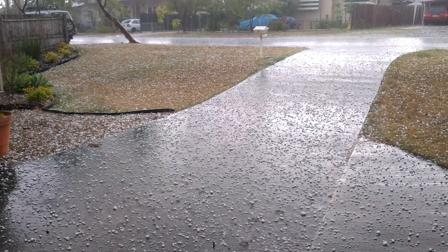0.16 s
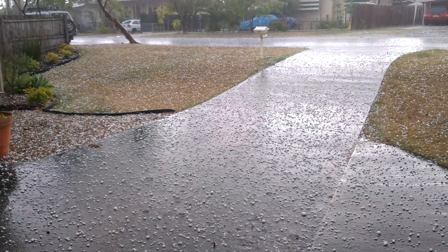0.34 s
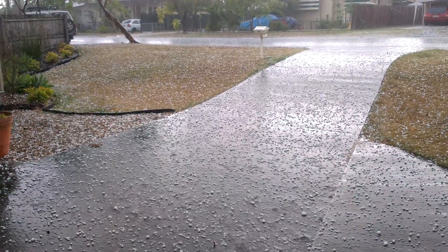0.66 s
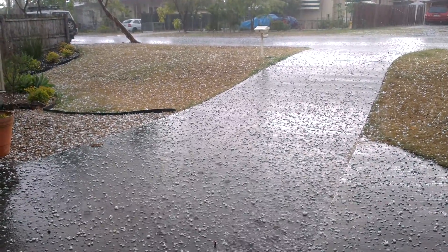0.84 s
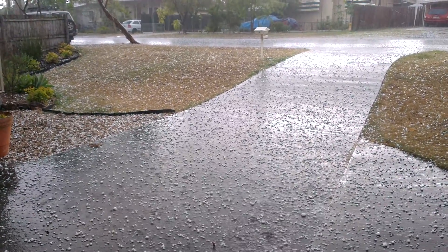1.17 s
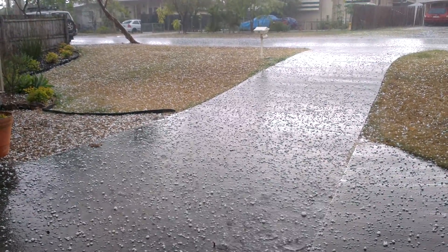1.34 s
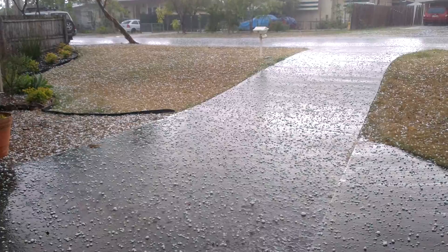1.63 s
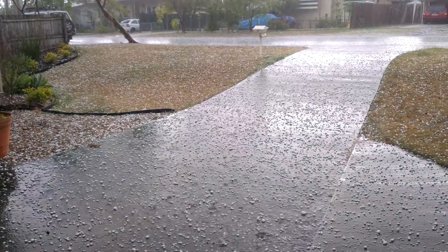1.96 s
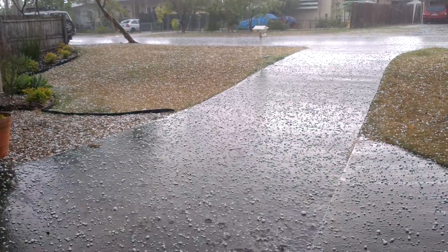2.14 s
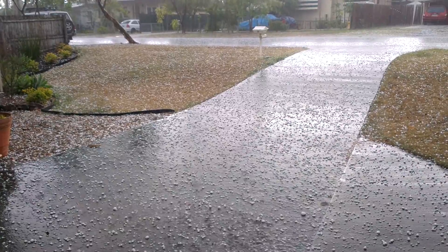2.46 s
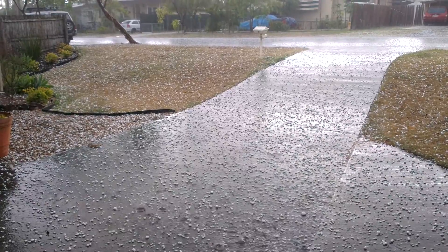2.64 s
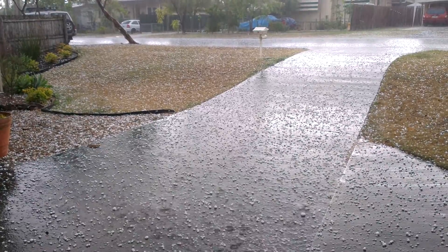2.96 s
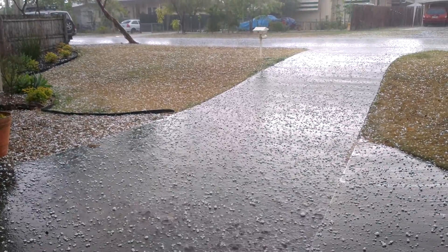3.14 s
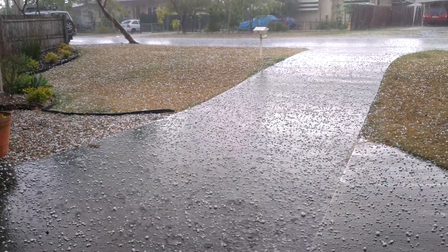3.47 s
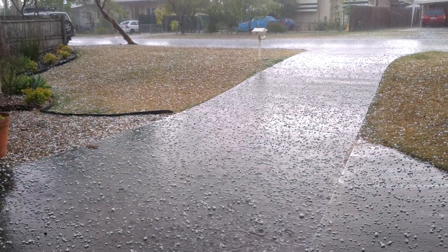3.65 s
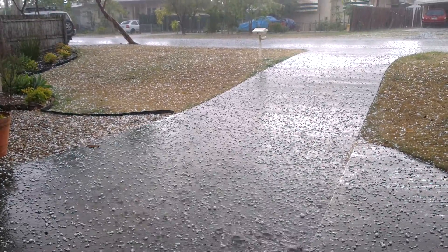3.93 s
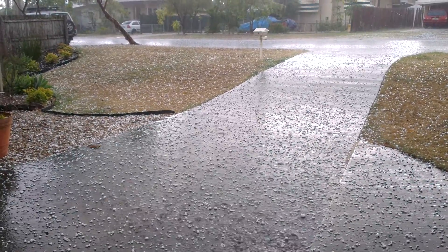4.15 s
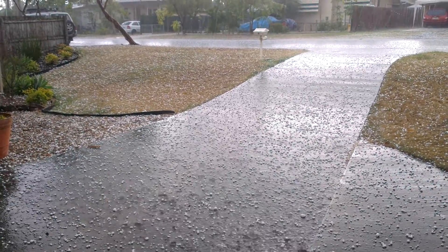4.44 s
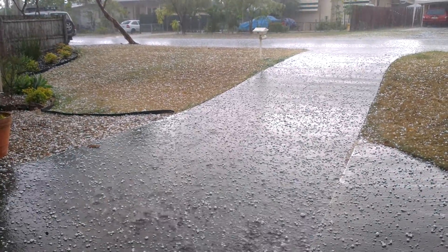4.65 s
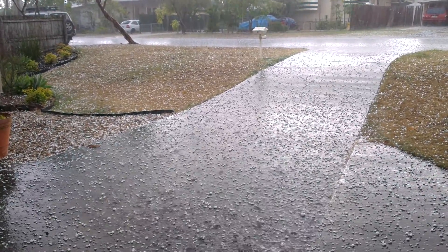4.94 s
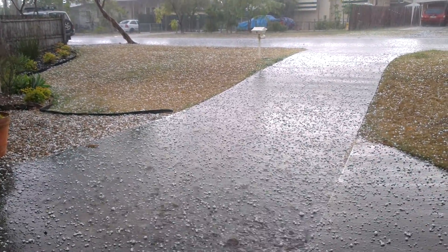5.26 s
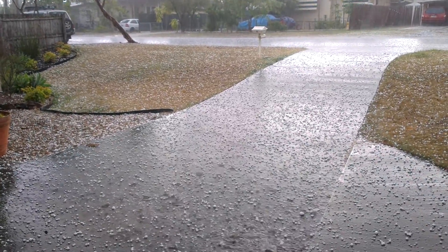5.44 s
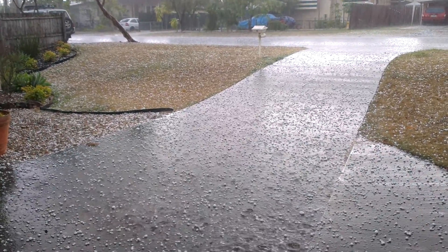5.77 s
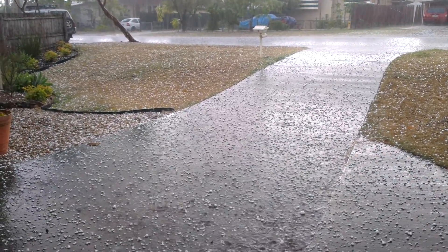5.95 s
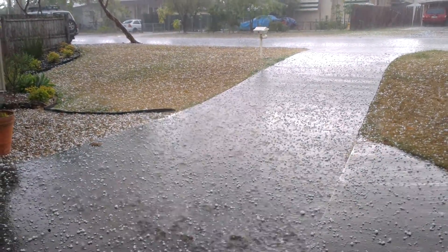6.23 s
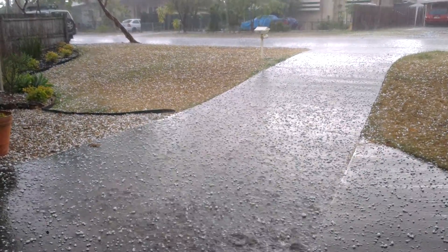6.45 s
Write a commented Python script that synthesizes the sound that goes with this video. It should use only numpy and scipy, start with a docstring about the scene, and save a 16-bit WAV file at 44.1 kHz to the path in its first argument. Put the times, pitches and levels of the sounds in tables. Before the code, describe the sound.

A hailstorm already in full force keeps going without pause. Countless distant stones blend into a grainy, fizzing patter; near clumps of ice chips and droplets swell and fade several times a second, scattered left and right. Single stones stand out as crisp high clicks or short hollow knocks. Open driveway outdoors, close handheld stereo pickup, no thunder.

```python
"""Near hail and rain spatters pelt a wet concrete driveway and a lawn, heard from the edge of the house.
Each spatter is a swelling, fading clump of pings from ice chips and droplets.
Single stones tick sharply or knock dully: noise bursts ringing around a pitch.
Countless farther stones merge into a rattling wash, a dense stream of pings with a fluttering level.
The camera's two microphone ports colour the sound and its widener spreads the stereo picture."""
import sys
import numpy as np
from scipy.fft import rfft, irfft, next_fast_len
from scipy.io import wavfile
from scipy.ndimage import map_coordinates

SR = 44100
rng = np.random.default_rng(int(sys.argv[2]) if len(sys.argv) > 2 else 0)


def generate_wav(sig):
    """Save sig (samples, or channels by samples) to the path in sys.argv[1] as 16-bit PCM at SR."""
    pcm = np.round(np.clip(np.atleast_2d(sig).T, -1, 1) * 32767).astype(np.int16)
    wavfile.write(sys.argv[1], SR, pcm)


N = 291043


def amp(db):
    """Decibels to gain."""
    return 10 ** (np.asarray(db) / 20)


def unit(x):
    """x at rms 1."""
    return x / np.sqrt(np.mean(x ** 2) + 1e-20)


def along(points, hz):
    """(Hz, value) points interpolated on a log frequency axis."""
    point_hz, values = np.transpose(points)
    return np.interp(np.log(hz + 1), np.log(point_hz), values)


def wobble(knots_per_s):
    """Smooth random curve through normally distributed knots."""
    knots = rng.standard_normal(int(N * knots_per_s / SR) + 4)
    return map_coordinates(knots, [np.arange(N) * knots_per_s / SR])


def filtered(x, response):
    """x times a response of frequency, with zero padding."""
    n = x.shape[-1]
    padded = next_fast_len(n + SR // 20)
    return irfft(rfft(x, padded) * response(np.fft.rfftfreq(padded, 1 / SR)), padded)[..., :n]


def add(track, start, sound):
    """Mix a stereo sound into the track from sample start on, trimmed to fit."""
    lo, hi = max(start, 0), min(start + sound.shape[1], N)
    if hi > lo:
        track[:, lo:hi] += sound[:, lo - start:hi - start]


def sides(left_minus_right_db):
    """Left and right gains for a level difference."""
    return amp(np.array([[left_minus_right_db], [-left_minus_right_db]]) / 2)


def impacts(pings_per_s, size_db, blur, decay_cycles, ping_samples=256):
    """Two streams of tiny damped pings of uneven size and pitch, partly blurred by scattering; rms near 1."""
    count = int(2 * pings_per_s * N / SR)  # both streams together
    when, side, pitch, size = rng.random((count, 4)).T
    hz = 500 * 32 ** pitch[:, None]
    cycles = hz * np.arange(ping_samples) / SR
    # high pings are brief: extra height keeps their energy per hertz
    height = hz * amp(size_db * size[:, None])
    pings = height * np.exp(-cycles / decay_cycles) * np.sin(2 * np.pi * cycles)
    start = (when * (N - ping_samples)).astype(int) + N * (side > .5)
    places = start[:, None] + np.arange(ping_samples)
    streams = np.bincount(places.ravel(), pings.ravel(), 2 * N).reshape(2, N)
    return unit(unit(streams - streams.mean()) + blur * rng.standard_normal((2, N)))


# Likeness of the two microphone ports. Each row: frequency in Hz, correlation 0-1.
PORT_LIKENESS = [(60, .3), (180, 0.65), (700, 0.97), (1100, 0.64), (1550, 0), (2100, 0.41), (7000, 0.4),
                 (15000, 0.5)]


def at_ports(pair, colour):
    """Colour two unrelated streams and blend them as mid and side: less likeness, more side."""
    def mid_and_side(hz):
        alike = np.clip(along(PORT_LIKENESS, hz), 0, 1)
        side_gain = np.sqrt((1 - alike) / (1 + alike))
        return unit(amp(along(colour, hz))) * np.array([np.ones_like(hz), side_gain])

    mid, side = filtered(pair, mid_and_side)
    return np.array([mid + side, mid - side])


# Loudest near spatters. Each row: middle in seconds, spread in seconds, level in dB before gain_db,
# brightness in dB per octave, left minus right in dB.
LOUD_SPATTERS = [(0.031, 0.015, -23.5, 2.5, 2), (0.076, 0.012, -24.0, -0.5, 0),
                 (0.137, 0.0077, -21.5, 3, -2), (0.239, 0.025, -23.5, -1.5, 3.5),
                 (0.33, 0.011, -24.5, 2.5, -1), (0.387, 0.013, -21, -0.5, -3),
                 (0.516, 0.015, -23.5, 0.5, 0.5), (0.56, 0.012, -21.5, 0.5, 7),
                 (0.615, 0.014, -23.5, 0.5, -1), (0.759, 0.029, -29.5, -3, 4), (0.847, 0.023, -27, 2, 2),
                 (0.931, 0.027, -24.5, 1, 1), (1.1, 0.013, -19, -2, -0.5), (1.159, 0.0078, -22.5, 1.5, -3),
                 (1.266, 0.02, -23, 2.5, 6), (1.336, 0.012, -21.0, -2, 4.5), (1.45, 0.022, -16.5, 0.5, 0),
                 (1.517, 0.0092, -24, -3.5, 2), (1.552, 0.014, -18, 0.5, 4.5), (1.595, 0.013, -27, 0.5, -4),
                 (1.683, 0.025, -21.5, -0.5, 1), (1.82, 0.013, -20.5, -1.5, 0.5),
                 (1.872, 0.0061, -23.5, 2.5, 5), (2.066, 0.0087, -20, 2.5, 0),
                 (2.118, 0.0093, -19.5, -0.5, 0.5), (2.174, 0.011, -22.5, 0.5, 0),
                 (2.272, 0.02, -25.5, 3, 1), (2.352, 0.019, -32.5, -6, -1), (2.397, 0.0072, -21.5, 0, 6),
                 (2.49, 0.026, -27, -3, -1), (2.599, 0.013, -29, 0.5, 2), (2.732, 0.02, -28, -0.5, 2),
                 (2.834, 0.023, -25.5, 4, 2), (2.952, 0.016, -25.5, 0, 0), (3.067, 0.0085, -23, 3, 4),
                 (3.13, 0.021, -28, 4, -3), (3.219, 0.012, -24, 0.5, 7), (3.262, 0.012, -21.5, 0.0, -1),
                 (3.481, 0.026, -22, 2, 1), (3.591, 0.028, -24.5, 0.0, 0.5), (3.853, 0.021, -21.5, 0.5, 4),
                 (3.913, 0.018, -30, 0.5, 0), (4.021, 0.016, -26, -0.5, 1.5), (4.12, 0.0054, -23, -2, 3),
                 (4.157, 0.012, -19, 1.5, 1), (4.495, 0.027, -26, -0.5, 5), (4.554, 0.0079, -24.5, 1.0, -2),
                 (4.623, 0.018, -26, -1, 8), (4.717, 0.015, -24, -1.5, 4), (4.805, 0.018, -22.5, -1.0, 2),
                 (4.864, 0.0068, -20, 0.5, 3), (4.981, 0.023, -24.5, 0, 2.5),
                 (5.077, 0.017, -23, -2.5, 6.5), (5.132, 0.035, -27, -2.5, -8),
                 (5.296, 0.025, -22.5, -2, 4), (5.362, 0.011, -20, 1, -1), (5.435, 0.012, -26.5, -4.5, -2),
                 (5.476, 0.013, -21.5, -0.5, 2), (5.531, 0.007, -21.5, -1.0, -1),
                 (5.587, 0.02, -20.5, 0, -1.5), (5.688, 0.0077, -22, 1, -9), (5.76, 0.013, -25.5, -3.5, 4),
                 (5.817, 0.0096, -19, 1, 3), (5.861, 0.019, -30.5, 5.5, 3), (5.924, 0.01, -23, 0.5, 8),
                 (5.97, 0.024, -21.5, -0.5, -2.5), (6.056, 0.014, -21.5, -0.5, -2),
                 (6.14, 0.017, -19.5, -2, 2), (6.309, 0.011, -24.5, -0.5, 2), (6.389, 0.014, -22.5, 0.5, 1),
                 (6.429, 0.019, -26.5, -2, -1), (6.503, 0.023, -29, 2.5, -1)]
# Spatter spectrum. Each row: frequency in Hz, relative density in dB per Hz.
SPATTER_SPECTRUM = [(110, -53.5), (200, -43.5), (300, -26.5), (600, -9), (950, -2.5), (1300, 1), (1900, -4),
                    (2750, -0.24), (4300, -4.5), (6500, -6.5), (7700, -12), (9200, -9), (11000, -16.5),
                    (12300, -24.5), (15500, -31)]
SWELL_STEEPNESS = 2.14  # 2 is a bell, more is squarer


def spatters(rows, pivot_hz=3000, gain_db=-4.5, own_colour_db=2.0, spray_hz=6500, spray_db=2.5,
             dull_hz=1900, dull_db=2.0, band_count=40):
    """Clumps of ice chips and droplets swell and fade; finer chips sound brighter."""
    chips = at_ports(impacts(pings_per_s=1600, size_db=4.0, blur=2.58, decay_cycles=1.68), SPATTER_SPECTRUM)
    # fine spray and dull, coarse chips flare and drop independently
    dull = filtered(chips, lambda hz: 1 / (1 + (hz / dull_hz) ** 6))
    spray = filtered(chips, lambda hz: 1 / (1 + (spray_hz / (hz + 1)) ** 6))
    spray_gain = amp(spray_db * wobble(70) - 2.5)
    dull_gain = amp(dull_db * wobble(50) - 1.0)
    chips = chips + spray * (spray_gain - 1) + dull * (dull_gain - 1)

    bands_hz = np.geomspace(600, 14000, band_count)
    out = np.zeros((2, N))
    for middle_s, spread_s, db, bright, pan_db in rows:
        first = max(int((middle_s - 7 * spread_s) * SR), 0)
        last = min(int((middle_s + 7 * spread_s) * SR), N)
        span = np.arange(first, last)
        swell = np.exp(-np.abs((span / SR - middle_s) / (2 * spread_s)) ** SWELL_STEEPNESS)
        # each landing spot has its own ripple of reflections
        ripple = np.column_stack([bands_hz, own_colour_db * rng.standard_normal(band_count)])

        def tilt(hz):
            octaves = np.log2(np.clip(hz, 600, 11000) / pivot_hz)
            return amp(along(ripple, hz) + bright * octaves)

        clump = filtered(chips[:, span] * swell, tilt)
        add(out, span[0], amp(db + gain_db) * sides(pan_db) * clump)
    return out


# Strength of the hail. Each row: time in seconds, level in dB before each layer's offset.
STORM_LEVEL = [(0.0, -25.5), (1.15, -25), (1.55, -24.5), (1.86, -25), (3.57, -27), (3.96, -23.5),
               (5.44, -25), (5.67, -27.5), (5.93, -24.5), (6.55, -25)]


def storm_db(s):
    """Strength of the hail at the times s, interpolated."""
    return np.interp(s, *np.transpose(STORM_LEVEL))


def lesser_spatters(count=84, offset_db=-2.5, scatter_db=1, spread_s=0.0066, tilt_db_per_octave=1.9, pan_db=2.5):
    """Weaker spatters fall at an uneven pace and follow the storm: rows like the loud ones."""
    when_s = (np.arange(count) + rng.random(count)) / count * N / SR
    length, size, bright, pan = rng.standard_normal((count, 4)).T
    level_db = storm_db(when_s) + offset_db + scatter_db * size
    return np.column_stack([when_s, spread_s * 2 ** (length / 2), level_db,
                            tilt_db_per_octave * bright, pan_db * pan])


# Spectrum of single strikes. Each row: frequency in Hz, relative density in dB per Hz.
STRIKE_SPECTRUM = [(120, -21), (600, -4.5), (10000, -6.5), (12300, -10.5)]


def strikes(rows, sharpness, crack_t60_s, scatter_t60_s, scatter_db):
    """Noise with two decays, crack and scatter from ground and walls, rings around each stone's pitch."""
    t = np.arange(SR // 10) / SR
    decay = amp(-60 * t / crack_t60_s) + amp(scatter_db - 60 * t / scatter_t60_s)
    out = np.zeros((2, N))
    for start_s, db, pitch_hz in rows:
        def ring(hz):
            damping = 1j * hz * pitch_hz
            return (damping / (sharpness * (pitch_hz ** 2 - hz ** 2) + damping)) ** 2

        crack = filtered(decay * rng.standard_normal((2, len(t))), ring)
        add(out, round(start_s * SR), amp(db) * crack / np.abs(crack).max())
    return at_ports(out, STRIKE_SPECTRUM)


def small_stones(level_db, spread_db, low_hz, high_hz, count):
    """Small single stones land at random moments: rows of start in s, level in dB, pitch in Hz."""
    when, size, pitch = rng.random((count, 3)).T
    pitch_hz = low_hz * (high_hz / low_hz) ** pitch
    return np.column_stack([when * N / SR, level_db + spread_db * size ** 2, pitch_hz])


# Hard ice on concrete. Each row: start in seconds, peak in dB before port colouring, pitch in Hz.
LOUD_TICKS = [(0.1346, -15, 6200), (0.7801, -22, 6550), (1.0226, -28, 6410), (1.349, -16, 8900),
              (1.4755, -17, 6600), (1.677, -16, 6400), (1.7988, -17, 9280), (1.9624, -20, 6800),
              (2.578, -17, 6700), (2.7784, -29, 6490), (3.3633, -17, 8900), (3.7589, -20, 8860),
              (4.1106, -20, 6010), (4.5624, -27, 6120), (4.6364, -24, 6850), (4.9048, -20.5, 6660),
              (5.5305, -20, 6200), (5.6885, -24, 6420)]


def ticks():
    """Hard ice strikes concrete: high pitch, brief crack, weaker scatter."""
    small = small_stones(level_db=-30.5, spread_db=7, low_hz=6500, high_hz=9700, count=50)
    return strikes(np.vstack([LOUD_TICKS, small]), sharpness=2.2,
                   crack_t60_s=.005, scatter_t60_s=.045, scatter_db=-9)


# Big, soft stones. Each row: start in seconds, peak in dB before port colouring and gain_db, pitch in Hz.
LOUD_KNOCKS = [(0.249, -13, 1240), (0.554, -14, 1380), (0.754, -16, 1370), (1.647, -18, 990),
               (1.735, -14, 1610), (1.989, -17.5, 1340), (2.395, -13, 1280), (2.599, -17.5, 1150),
               (2.954, -15.5, 1380), (3.649, -16, 1330), (3.854, -22, 1230), (4.059, -16, 1120),
               (5.088, -15, 1380), (5.36, -14, 1290)]


def knocks(gain_db=-6.0):
    """Dull stones strike at a lower pitch, with longer decays and strong scatter."""
    small = small_stones(level_db=-22.5, spread_db=7.5, low_hz=1050, high_hz=3300, count=70)
    return amp(gain_db) * strikes(np.vstack([LOUD_KNOCKS, small]), sharpness=1.9,
                                  crack_t60_s=0.091, scatter_t60_s=0.2, scatter_db=5)


# Spectrum of the distant hail. Each row: frequency in Hz, relative density in dB per Hz.
WASH_SPECTRUM = [(110, -54), (200, -40), (300, -25), (600, -11.5), (950, -2.5), (1300, -0.5), (1900, -5),
                 (2750, -3.5), (4300, -8), (6500, -11), (7700, -16.5), (9200, -14.5), (11000, -20.5),
                 (12300, -29), (15500, -32.5)]


def wash(offset_db=-1.5, patter_db=1.3, fizz_db=1.3, split_hz=1900):
    """Distant stones merge; dull patter and bright fizz flutter independently under the storm level."""
    stones = at_ports(impacts(pings_per_s=1100, size_db=2.5, blur=1, decay_cycles=1.5), WASH_SPECTRUM)
    patter = filtered(stones, lambda hz: 1 / (1 + (hz / split_hz) ** 4))
    fizz = stones - patter
    flutter = patter * amp(patter_db * wobble(65)) + fizz * amp(fizz_db * wobble(68))
    return amp(storm_db(np.arange(N) / SR) + offset_db) * unit(flutter)


def scene():
    """Near spatters, ticks and knocks over the distant wash."""
    near = spatters(np.vstack([LOUD_SPATTERS, lesser_spatters()]))
    return near + ticks() + knocks() + wash()


# Balance of the microphone ports. Each row: frequency in Hz, left minus right in dB.
PORT_BALANCE = [(300, 0), (500, 6), (800, 5), (1400, 3.5), (2700, 1.5), (4200, 1), (5400, -5), (7500, 0.3),
                (8800, 9.5), (11200, 8), (13000, 5), (15300, -9)]
# Resonances of the microphone housing. Each row: centre in Hz, width in Hz, gain in dB.
HOUSING_RESONANCES = [(2660, 110, 1), (4840, 220, 3), (6800, 360, 2)]
TOP_HZ = 15750


def record(dry, echo_gain=.5, delay_s=.00202):
    """Colour each port, widen by adding a late copy of the side signal to itself, cut above TOP_HZ."""
    def port_gains(hz):
        balance_db = along(PORT_BALANCE, hz)
        gains = amp(np.array([balance_db, -balance_db]) / 2)
        housing_db = sum(db * np.exp(-((hz - centre) / width) ** 2)
                         for centre, width, db in HOUSING_RESONANCES)
        return amp(housing_db) * gains / np.sqrt(np.mean(gains ** 2, axis=0))

    left, right = filtered(dry, port_gains)
    mid = (left + right) / 2
    side = filtered((left - right) / 2, lambda hz: 1 + echo_gain * np.exp(-2j * np.pi * hz * delay_s))
    return filtered(np.array([mid + side, mid - side]), lambda hz: hz < TOP_HZ)


dry = scene()
out = record(dry)
generate_wav(out)
```